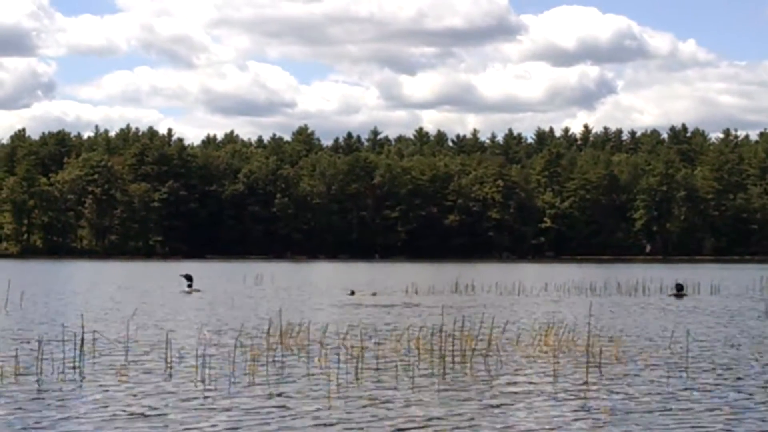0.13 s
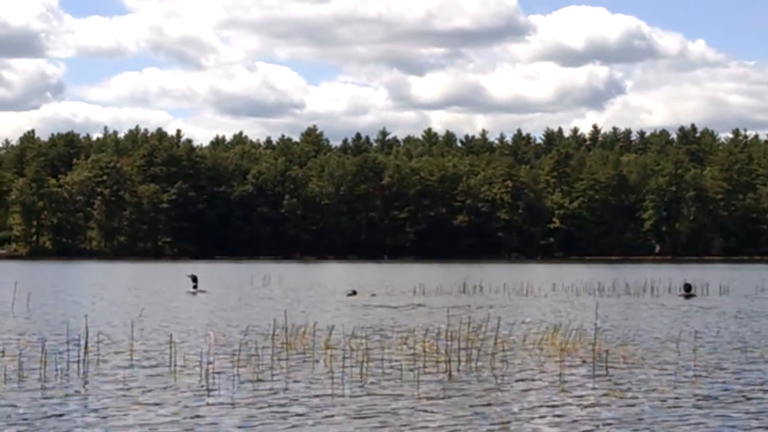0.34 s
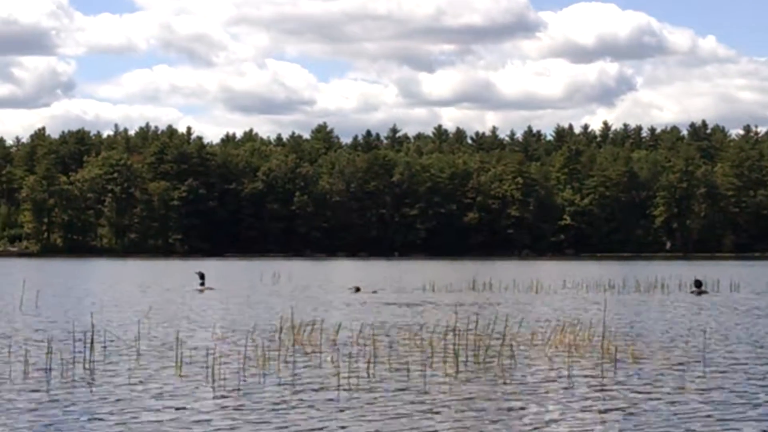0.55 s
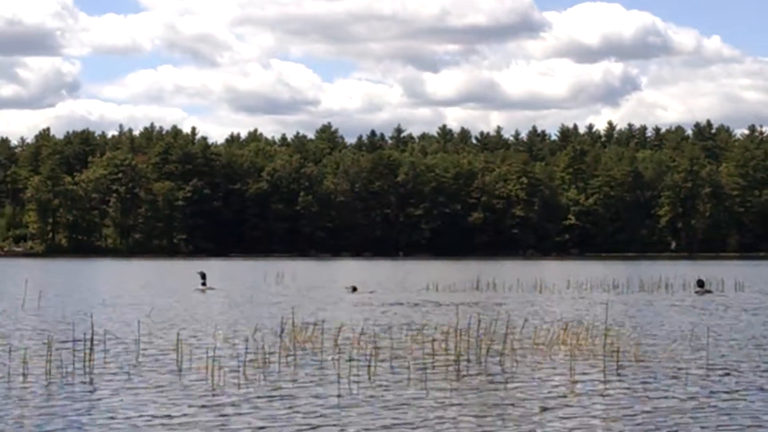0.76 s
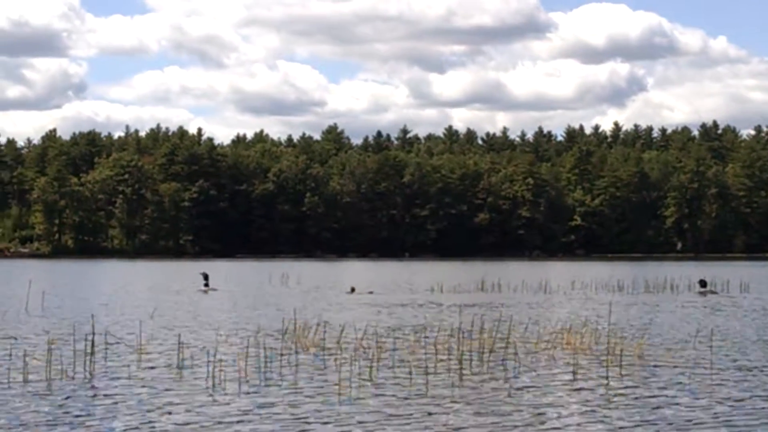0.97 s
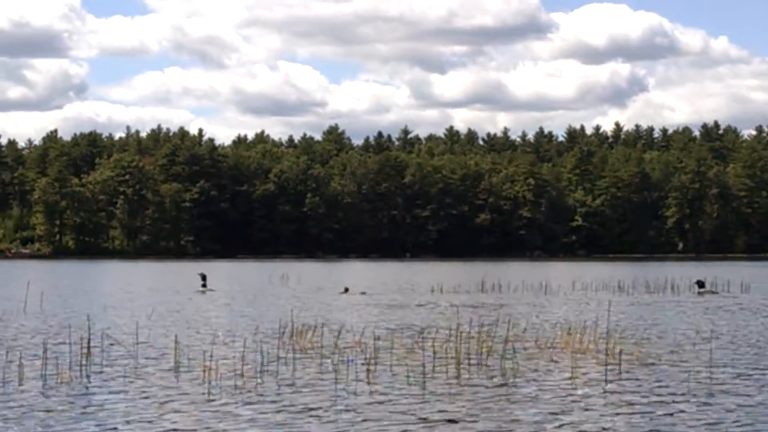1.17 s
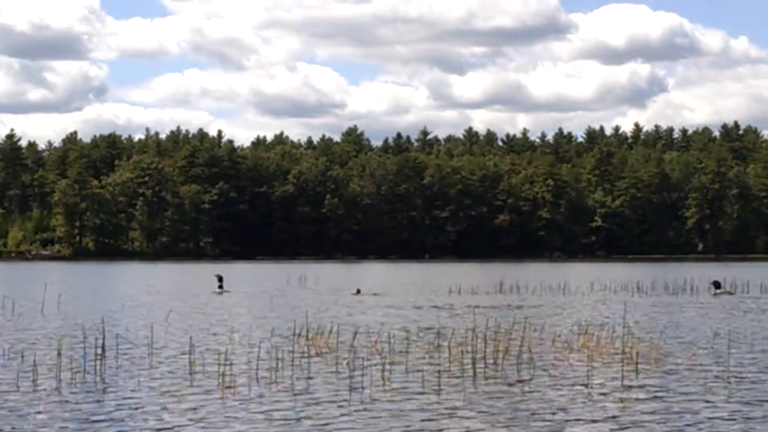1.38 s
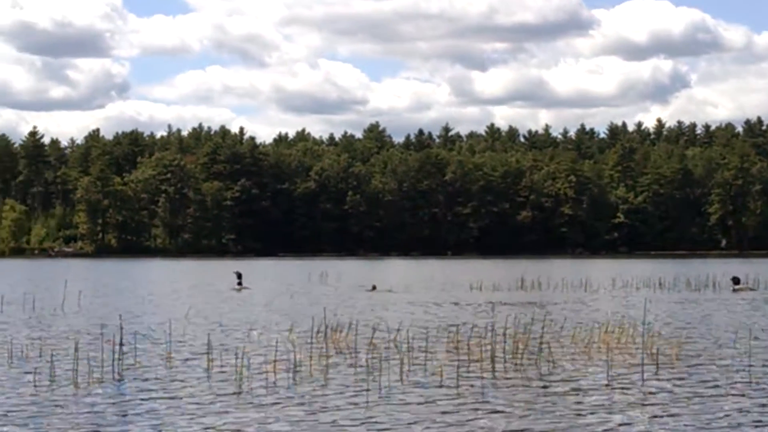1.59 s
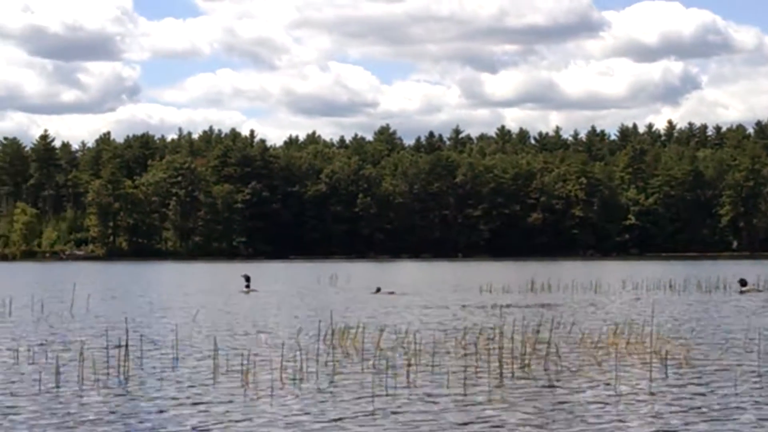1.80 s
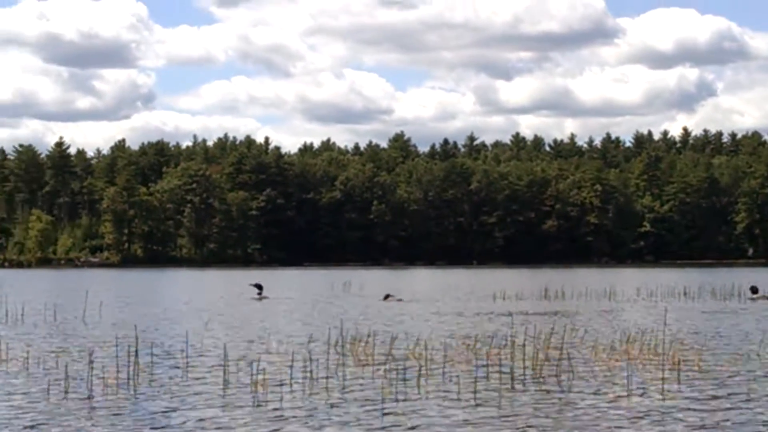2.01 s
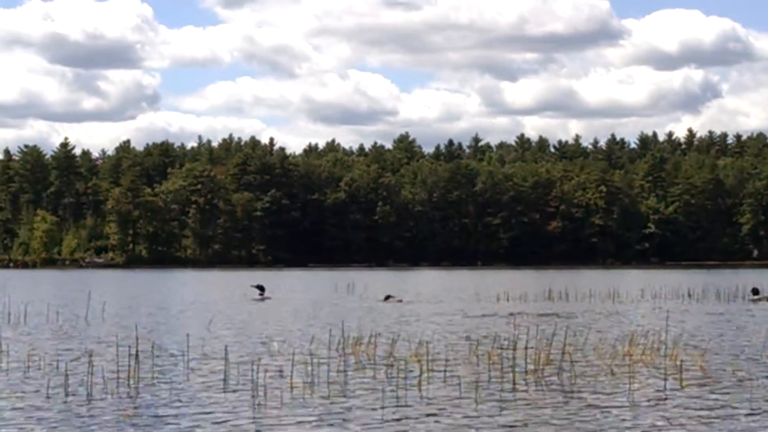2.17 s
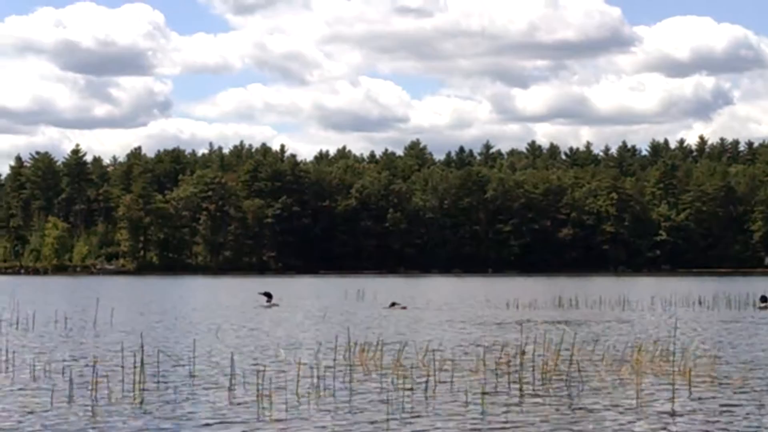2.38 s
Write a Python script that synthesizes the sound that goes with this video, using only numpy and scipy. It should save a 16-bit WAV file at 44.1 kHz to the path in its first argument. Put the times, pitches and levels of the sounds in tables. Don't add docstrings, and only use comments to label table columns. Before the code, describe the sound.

A loon begins a soft rising lead-in at 0 s, settling by 0.25 s into a long, slowly climbing low note. At 0.84 s it breaks to a higher, slightly sinking note with tiny catches, then drops at 1.58 s and dies by 1.9 s. Faint smeared tree-line echoes start around 0.8 s and outlast it, over air hiss, dim engine drone and scattered wind thuds, strongest near 1 and 1.9 s.

```python
import sys
import numpy as np
from scipy import signal
from scipy.fft import rfft, irfft
from scipy.io import wavfile
from scipy.ndimage import uniform_filter1d

SR = 44100
rng = np.random.default_rng(int(sys.argv[2]) if len(sys.argv) > 2 else 0)


def bounce(signal):
    frames = np.transpose(np.atleast_2d(signal))
    limited = np.clip(frames, -1, 1)
    pcm = np.round(limited * 32767).astype(np.int16)
    wavfile.write(sys.argv[1], SR, pcm)


def ratio_of_db(decibels):
    return 10 ** (np.asarray(decibels, float) / 20)


N = 108045
T = np.arange(N) / SR

# time in seconds, strength, blip level in dB.
CATCHES = [(0.913, 1.2, -45), (.957, 0.62, -59), (.997, 1.2, -45.5), (1.069, 1, -44.5), (1.12, 0.29, -55.5),
           (1.152, 0.52, -57.5), (1.169, 1.2, -43.5), (1.229, 1, -45), (1.284, .8, -60.5),
           (1.295, 1.3, -47), (1.347, 1.3, -47.5), (1.386, 0.45, -50), (1.4, 2.4, -54.5),
           (1.449, .9, -55.5), (1.463, 1.6, -46.5), (1.508, 0.85, -57.5), (1.532, 0.54, -49)]


def rms_one(x):
    return x / np.sqrt(np.mean(x ** 2) + 1e-20)


def at_hz(points, hz, order=1):
    p = np.array(points)
    return np.interp(np.log(np.maximum(hz, 1)), np.log(p[:, 0]), p[:, order])


def curve(rows, t):
    s, *cols = np.transpose(rows)
    return [np.interp(t, s, c) for c in cols]


def low(x, hz):
    return signal.sosfilt(signal.butter(2, hz, fs=SR, output="sos"), x)


def drift(rate_hz):
    return rms_one(low(rng.standard_normal(N + SR), rate_hz)[SR:])


def coloured(spectrum):
    gain = ratio_of_db(at_hz(spectrum, np.fft.rfftfreq(N, 1 / SR)))
    return rms_one(irfft(rfft(rng.standard_normal(N)) * gain, N))


def resonance_power(hz, resonances):
    return sum(ratio_of_db(2 * db) / (1 + (2 * (hz - c) / w) ** 2) ** 2 for c, w, db in resonances)


def dip(hz, centre_hz, width_hz, db):
    return ratio_of_db(db / (1 + (2 * (hz - centre_hz) / width_hz) ** 4))


def loon():
    return ticks() + voice(sag())


def voice(slack):
    # frequency in Hz, left lead in rad, left minus right in dB.
    ports = [(600, .44, -2.5), (780, 0.41, -2), (1290, 0.34, -1.4), (1900, .03, 1.5), (2560, 0.86, -2),
             (4800, 0.99, -1.6), (9200, 1.5, -0.5)]
    half_orders_db = [2, -2.8, -12, -4.5, 19, -2.5, 6, 4, 5.5, 13.5]
    hz, db, over_db, tilt = registers()
    waver_hz = np.interp(hz, [700, 750], [.6, .9])
    hz = hz - 6.0 * slack + waver_hz * drift(22)
    depth, beat = register_beat()
    phase = 2 * np.pi * np.cumsum(hz) / SR - 2 * 0.32 * depth * np.sin(beat)
    half = strong_weak_cycles()
    shimmer_db, sag_db, breath_db = 0.15, 0.95, -40
    swell = ratio_of_db(shimmer_db * drift(30) - sag_db * slack)
    swell = swell * (1 + 2 * depth * np.cos(beat) + ratio_of_db(breath_db) * drift(310))
    fading = drift(16)
    fade_db_per_octave = .2
    patchy_db = 1.8 * (hz > 720)
    rasp = ratio_of_db(-23.5) * drift(160)
    beat_over_db, beat_twice_db = 8.5, -2.5

    out, side = np.zeros((2, N)), np.array([[.5], [-.5]])
    for k in [*np.arange(.5, 10), *range(1, 22)]:
        is_half = k % 1 > 0
        end = SR // 2 if is_half else 2 * SR
        coarse, span = slice(0, end, 32), slice(0, end)
        f = k * hz[coarse]
        own = np.roll(fading, rng.integers(N))[coarse]
        slope_db = (tilt[coarse] + fade_db_per_octave * own) * np.log2(k / 2)
        gain = ratio_of_db(over_db[coarse] + slope_db + patchy_db[coarse] * own) * (f < 15500)
        gain = gain * vocal_tract(f, T[coarse])
        parts = gain, at_hz(ports, f), at_hz(ports, f, order=2)
        gain, lead, lean_db = [np.interp(T[span], T[coarse], c) for c in parts]
        if k == 1:
            gain = ratio_of_db(db[span])
        else:
            gain = gain * (1 + np.roll(rasp, rng.integers(N))[span])
        if is_half:
            gain = gain * half[span] * ratio_of_db(half_orders_db[int(k)])
        turn = k * phase[span] + rng.uniform(0, 2 * np.pi) + side * lead
        under = np.sin(turn - beat[span]) + ratio_of_db(beat_twice_db) * np.sin(turn - 2 * beat[span])
        under = (k > 1) * ratio_of_db(beat_over_db) * depth[span] * under
        out[:, span] += swell[span] * gain * ratio_of_db(side * lean_db) * (np.sin(turn) + under)
    return out


def registers():
    # time in seconds, pitch in Hz, fundamental in dB, overtones in dB,
    # overtone tilt in dB per octave.
    lead_in = [
        (0, 386, -50.5, -36.5, -24),
        (.06, 416, -42.5, -47, -21),
        (.12, 447.7, -39, -52, -19.5),
        (.18, 497.5, -35, -48, -23),
        (.2, 530, -35, -48.5, -19.5),
        (.212, 586, -31, -44, -7),
    ]
    low_note = [
        (0.242, 583.7, -29, -41, -7),
        (.34, 600, -23.5, -37, -4.5),
        (0.461, 611.2, -20, -34.5, -0.5),
        (0.619, 623.4, -18.5, -38, 1.5),
        (.76, 636.6, -17.5, -38.5, 1.5),
        (.81, 650, -16.5, -40, 4.5),
        (0.838, 682.4, -18, -37, -3.5),
        (0.8425, 707, -20, -41.5, -7),
    ]
    high_note = [(0.842, 824, -22.5, -54, 0.003), (0.849, 795.1, -16, -40.5, 0.0092),
                 (0.961, 795, -15.5, -39, 0.007), (1.11, 788.3, -16, -37.5, 0.0037),
                 (1.2, 780.3, -16.5, -39.5, 0.0098), (1.321, 776.8, -16.5, -41.5, 0.0054),
                 (1.43, 770.4, -17.5, -45.5, 0), (1.491, 769.8, -17.5, -48, 0),
                 (1.545, 761, -18.5, -57.5, 0.0016), (1.577, 756.3, -20, -57, 0.0035),
                 (1.582, 759, -20, -70, 0.0043)]
    falling = [
        (1.585, 671, -23.5, -49, 0.5),
        (1.592, 604.1, -21.5, -35, -5.5),
        (1.629, 597.5, -23, -34.5, -7),
        (1.732, 589, -24.5, -36, -7),
        (1.822, 576, -26.5, -36.5, -10),
        (1.87, 563.4, -29, -39.5, -10.5),
        (1.897, 552.5, -34, -46, -15),
        (1.915, 562, -52.5, -77, -5),
    ]
    s, *cols = np.transpose(sorted(lead_in + low_note + high_note + falling))
    ends = (None, -120, -120, None)
    return [uniform_filter1d(np.interp(T, s, c, right=end), size=66) for c, end in zip(cols, ends)]


def register_beat():
    # time in seconds, beat in Hz, depth in dB.
    beating = [
        (0.843, 195.2, -21),
        (0.869, 183.7, -21),
        (0.919, 182.5, -33.5),
        (1.001, 180, -42),
        (1.48, 154.6, -47.5),
        (1.54, 150.7, -29),
        (1.585, 135.4, -22.5),
    ]
    s, beat_hz, beat_db = np.transpose(beating)
    depth = ratio_of_db(np.interp(T, s, beat_db, left=-99, right=-99))
    return depth, 2 * np.pi * np.cumsum(np.interp(T, s, beat_hz)) / SR


def strong_weak_cycles():
    start_s, end_s, fade_s, level_db = .238, 0.34, 0.016, -8.5
    fade_in = 1 + np.exp((start_s - T) / fade_s * 2)
    fade_out = 1 + np.exp((T - end_s) / fade_s * 2)
    return ratio_of_db(level_db) / fade_in / fade_out


def vocal_tract(f, t):
    # frequency in Hz, width in Hz, level in dB.
    windpipe = [(857, 160, 9), (1284, 398, -1), (1947, 417, -2), (2469, 120, -17), (4150, 100, -11),
                (3985, 170, -16.5), (4570, 320, -7), (4985, 330, -6), (5420, 200, -15), (3000, 300, -26.5),
                (3540, 250, -24), (12300, 200, -34.5)]
    # time in seconds, lower in Hz, its dB, upper in Hz, its dB.
    cavities = [(.33, 8540, -29, 10200, -25), (.45, 8150, -28.5, 10400, -40.5),
                (.55, 8150, -27, 10300, -46), (.68, 8870, -26.5, 12080, -33.5), (.8, 8670, -26, 9820, -41),
                (.87, 8700, -30, 9700, -30), (.97, 8700, -34, 10260, -27), (1.1, 8634, -42, 10210, -27.5),
                (1.2, 8550, -33, 10100, -31.5), (1.45, 8450, -25.5, 10000, -41),
                (1.56, 8450, -30, 10020, -44.5), (1.6, 8380, -12.5, 9130, -27),
                (1.68, 8300, -45.5, 9000, -47.5)]
    # time in seconds, branch in Hz, branch in dB, pipe stretch as a ratio.
    neck = [(0, 1492, -26, 1.008), (.13, 1750, -13, 0.95), (.25, 1774, -17.5, 1), (.42, 1769, -14, 0.95),
            (.6, 1774, -11, 1.016), (.83, 1650, -6, 1), (.86, 1603, -2, 1.02), (1.02, 1627, 0.5, 1.02),
            (1.2, 1577, -3, 1.05), (1.57, 1560, -1, 1.0125), (1.6, 1480, 2, 1.0), (1.9, 1450, -2, 1.017)]
    # time in seconds, Hz, dB.
    shade = [(.2, 3000, -8), (.45, 3080, -19.5), (.65, 3130, -19.5), (.8, 3140, -10), (.86, 3200, -5.5),
             (1.1, 3160, -9.5), (1.55, 3212, -2.5), (1.6, 3580, -10.5), (1.9, 3450, -11.5)]
    # time in seconds, Hz, dB.
    tongue = [(.2, 4150, 0), (.35, 4230, 4.5), (.45, 4280, -12), (.58, 4330, -5), (.68, 4400, -11),
              (.73, 4250, -7.5), (.78, 3900, -14.5), (.83, 4000, -7.5), (.85, 4000, 0), (1.58, 2950, -0.5),
              (1.6, 2950, -2)]
    # time in seconds, Hz, dB.
    bill_turn = [(.42, 6000, -11.5), (.5, 6000, -3), (.62, 5700, -14), (.74, 5440, -14.5),
                 (.79, 5310, -15.5), (.84, 5360, -16), (.86, 5820, -1), (1.1, 5900, -0.5), (1.2, 5460, -5),
                 (1.4, 5420, -10.5), (1.57, 5360, -11.5), (1.59, 5900, -2.5), (1.9, 5300, -7)]
    lower_hz, lower_db, upper_hz, upper_db = curve(cavities, t)
    mouth = [(lower_hz, 890, lower_db), (upper_hz, 890, upper_db)]
    branch_hz, branch_db, stretch = curve(neck, t)
    floor_db = -47.5
    power = ratio_of_db(2 * floor_db) + resonance_power(f * stretch, windpipe) + resonance_power(f, mouth)
    gain = np.sqrt(power) * dip(f, branch_hz, 210, branch_db)
    gain = gain * dip(f, 4950, 36, -15)
    for rows, width_hz in [(shade, 500), (tongue, 240), (bill_turn, 540)]:
        centre_hz, db = curve(rows, t)
        gain = gain * dip(f, centre_hz, width_hz, db)
    return gain


def sag():
    sag_s, snap_s = .018, 0.0039
    return sum(a * np.exp(np.where(T < s, (T - s) / sag_s, (s - T) / snap_s)) for s, a, _ in CATCHES)


def ticks():
    start_hz, glide_hz_per_s, length_s = 2254, 20000, .0022
    out = np.zeros(N)
    for s, _, db in CATCHES:
        t = T - s
        out += ratio_of_db(db) * np.exp(-(t / length_s) ** 2) * np.sin(2 * np.pi * (start_hz + glide_hz_per_s * t / 2) * t)
    return out


def shore(x):
    # time in seconds, rise in dB, length in seconds.
    swells = [(0.977, 9.5, .04), (1.12, 15, .02), (1.17, 13.5, .02), (1.282, 5.5, .05), (1.38, 8, .03),
              (1.635, 9, .02), (1.685, 10.5, 0.02), (1.734, 11.5, .018), (1.794, 8.5, 0.018),
              (1.857, 12.5, 0.029), (1.929, 12, 0.025), (1.975, 6.5, 0.0089), (2.029, 18.5, 0.028),
              (2.091, 11, 0.006), (2.124, 15, 0.017), (2.167, 17.5, 0.015), (2.233, 12.5, 0.037),
              (2.336, 15, 0.014)]
    x = low(x, 1900)
    echo_s, second_s, second_db = 0.795, 0.66, -11.5
    back = np.zeros(N)
    for delay_s, db in [(echo_s, 0), (echo_s + second_s, second_db)]:
        wobble_s = .0002 * drift(5.9)
        back += ratio_of_db(db) * np.interp(T - delay_s - wobble_s, T, x, left=0)
    back = back * ratio_of_db(sum(db * np.exp(-((T - s) / length) ** 2) for s, db, length in swells))
    left_db, right_db, near_db, near_t60_s = -51, -37.5, -47.5, .5
    t = T[:SR]
    near = ratio_of_db(-60 * t / near_t60_s) * (t > .02)
    near = near / np.linalg.norm(near)
    wash = [signal.fftconvolve(x, near * v)[:N] for v in rng.standard_normal((2, SR))]
    return back * ratio_of_db(np.array([[left_db], [right_db]])) + ratio_of_db(near_db) * np.array(wash)


def wind():
    # time in seconds, level in dB, length in seconds, swing in Hz.
    gusts = [(0.249, -37, 0.017, 80), (0.3, -32.5, 0.049, 30), (0.392, -37.5, 0.028, 54.4),
             (0.491, -37.5, 0.02, 61.4), (0.649, -39, 0.0031, 201), (0.681, -41.5, 0.038, 69.4),
             (0.993, -28, 0.014, 85), (0.99, -37.5, .003, 220), (1.067, -31, 0.01, 44.8),
             (1.552, -40, 0.054, 70), (1.752, -43, 0.029, 50), (1.9, -28.5, 0.024, 55),
             (1.962, -30, 0.017, 55), (1.997, -31, 0.0063, 90)]
    wobble = 0.99 * drift(25)
    out = np.zeros(N)
    for s, db, length_s, hz in gusts:
        t = T - s
        out += ratio_of_db(db) * np.exp(-(t / length_s) ** 2) * np.cos(2 * np.pi * hz * t + wobble)
    return out


def drone():
    # frequency in Hz, width in Hz, level in dB.
    rumble = [(72.5, 72, -57.5), (165.7, 21, -69.5), (106.5, 20, -69.5)]
    out = np.zeros(N)
    for hz, width_hz, db in rumble:
        swing = 1 + .5 * drift(width_hz / 2)
        out += ratio_of_db(db) * swing * np.sin(2 * np.pi * hz * T + 0.51 * drift(6.2))
    return out


def common_air():
    # frequency in Hz, level in dB per Hz.
    air = [(25, -12.5), (200, -4.5), (650, -9.5), (1200, -16.5), (3100, -31), (4500, -26.5), (7000, -30.5),
           (15400, -33.5)]
    return ratio_of_db(-54.5) * coloured(air)


def opposed_air():
    # frequency in Hz, level in dB per Hz.
    apart = [(15, -8), (35, -2.5), (120, -16), (700, -28.5), (1500, -53.5), (2300, -38.5), (7000, -45),
             (15000, -49.5)]
    hiss = ratio_of_db(-48) * coloured(apart)
    flutter_db = 3.5 * drift(9.3)
    return hiss + (ratio_of_db(flutter_db) - 1) * low(hiss, 250)


def background():
    thuds = wind()
    common = common_air() + drone() + ratio_of_db(-13) * thuds
    floor = common + (opposed_air() + thuds) * np.array([[1], [-1]])
    left_port_db = -2.5
    tip = ratio_of_db(np.array([[left_port_db], [-left_port_db]]) / 2)
    return floor + (tip - 1) * low(floor, 660)


def scene():
    bird = loon()
    return bird + shore(bird.mean(axis=0)) + background()


def top_cut(x):
    return signal.sosfilt(signal.butter(12, 15480, fs=SR, output="sos"), x)


def record(dry):
    gap_hz, gap_width_hz, gap_db = 13950, 850, -45
    mid = dry.mean(axis=0)
    hz = np.fft.rfftfreq(N, 1 / SR)
    kept = np.where(abs(hz - gap_hz) < gap_width_hz / 2, ratio_of_db(gap_db), 1)
    mix = dry - mid + irfft(rfft(mid) * kept, N)
    return top_cut(mix)


dry = scene()
out = record(dry)
bounce(out)
```